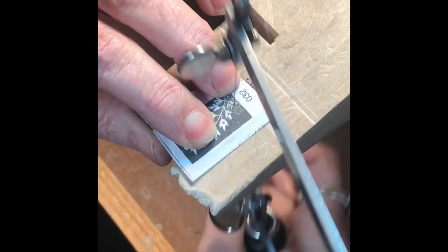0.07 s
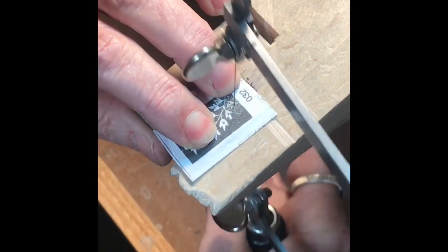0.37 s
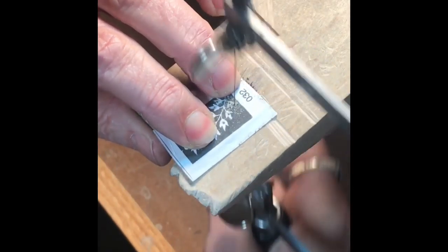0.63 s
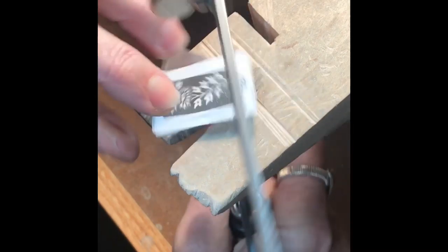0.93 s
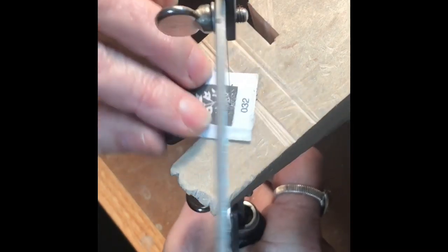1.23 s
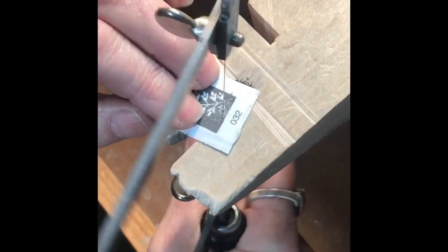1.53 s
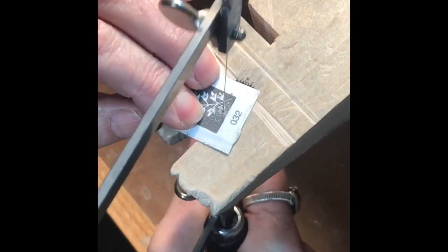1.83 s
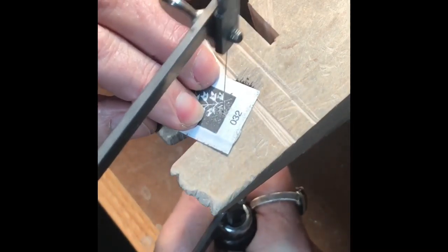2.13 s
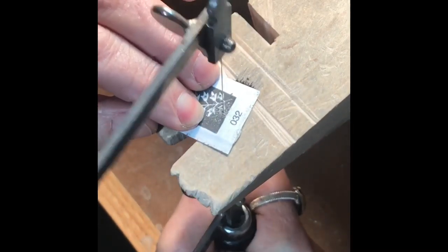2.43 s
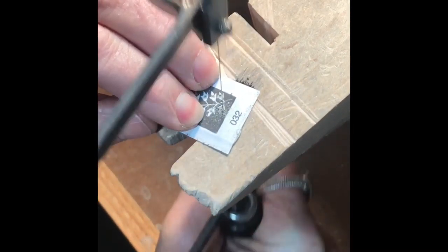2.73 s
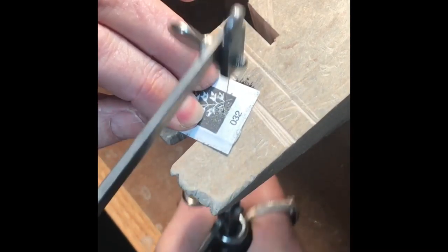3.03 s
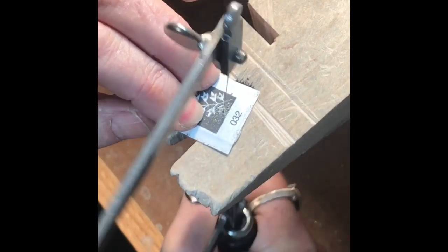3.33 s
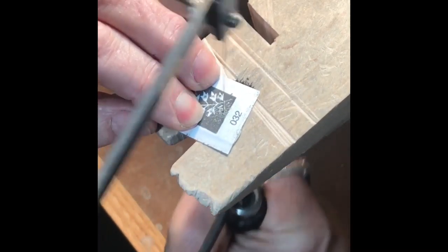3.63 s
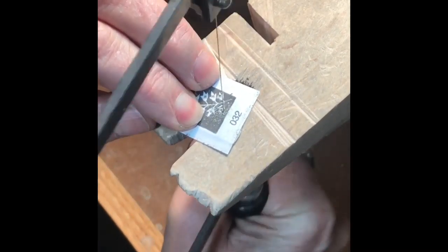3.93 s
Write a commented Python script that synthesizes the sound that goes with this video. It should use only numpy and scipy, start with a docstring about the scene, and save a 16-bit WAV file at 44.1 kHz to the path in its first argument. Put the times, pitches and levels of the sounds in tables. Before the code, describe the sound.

Quick sawing of thin metal with a fine blade, heard close up at a workbench. After five scraping strokes come light clinks and dull taps as the piece is turned, then louder, zipping strokes with soft wooden knocks.

```python
"""A small workshop, one microphone close to the bench: a jeweller's saw cuts a small metal plate.
In each stroke the teeth speed up and slow down, rasping the plate and shaking the wooden bench pin;
frame and hand thump on the pin. After five strokes the plate is let go, clinks against the blade,
is turned and set down; then the sawing resumes, harder. Quiet room tone lies behind it all."""
import sys
import numpy as np
from scipy import signal
from scipy.fft import rfft, irfft
from scipy.io import wavfile

SR = 44100
rng = np.random.default_rng(int(sys.argv[2]) if len(sys.argv) > 2 else 0)


def wav_out(sig):
    """Save sig, one row per channel (or a flat mono array), as 16-bit PCM at SR to the path in sys.argv[1]."""
    wavfile.write(sys.argv[1], SR, np.round(np.clip(np.atleast_2d(sig).T, -1, 1) * 32767).astype(np.int16))


N = 176400
T = np.arange(N) / SR
HZ = np.maximum(np.fft.rfftfreq(16384, 1 / SR), 1)

# Levels are relative within a layer; scene() sets the balance.
# saw strokes: start_s, length_s, peak_share, base_tooth_hz, bench_db, plate_db, rasp_db, zip_db
STROKES = [ (-.02, 0.13, 0.47, 779, -32.5, -34, -37.5, -12.5),
           (0.119, 0.15, 0.49, 899.8, -32, -35, -34, -25),
           (0.289, .168, 0.54, 809.7, -35.5, -37, -38.5, -18),
           (0.465, 0.15, 0.53, 861.6, -35.5, -38.5, -36.5, -20),
           (0.613, 0.15, .5, 694, -39.5, -40, -42, -20), (2.372, 0.13, 0.4, 1010, -31.5, -31, -32.5, -9.5),
           (2.508, 0.17, 0.15, 700, -50.5, -45, -45.5, -34),
           (2.758, 0.17, 0.46, 853, -35.5, -34.5, -36, -17),
           (2.926, 0.18, 0.58, 861, -38.5, -36, -36.5, -6), (3.122, .17, .47, 759.3, -29, -26, -30, -10.5),
           (3.315, 0.17, 0.54, 848.8, -34, -32, -36, -20), (3.527, .15, 0.36, 738, -31.5, -27.5, -31, -6.5),
           (3.683, 0.185, 0.56, 830.8, -34, -30, -31.5, -7),
           (3.895, 0.14, 0.45, 727.3, -28.5, -24.5, -28.5, -9)]
# the teeth dig in harder in mid-stroke: centre_s, half_length_s, lift_db
DIGS = [(.035, .012, 4), (0.207, 0.015, 6.5), (0.376, 0.023, 2.5), (0.544, .012, 6), (2.430, .014, 6.5),
        (2.454, 0.0079, 6), (2.843, 0.034, 3.5), (3.071, 0.028, 3.5), (3.205, 0.023, 3),
        (3.579, 0.018, 6.5), (3.728, 0.013, 3), (3.966, 0.016, 5.5)]
# harmonics of the tooth rate, from the first up: level_db
ZIP_HARMONICS = [-4, 1.5, -12, 3, -2.5, -3.5]
# resonances of the bench pin and saw frame: pitch_hz, width_hz, lift_db
BENCH_MODES = [(226, 14, 5.5), (270.2, 39, 12.5), (342, 15, 3.5), (452, 25, 14.5), (568, 105, -3),
               (608.4, 151, 17), (700, 26, 7.5)]
# resonances of plate and blade in each grip: pitch_hz, width_hz, lift_db
FIRST_GRIP_MODES = [(980, 206, 17.5), (1838, 93, 9.5), (1948, 52, 13), (2212, 80, 14.5), (2440, 170, 18),
                    (2970, 500, 5.5), (3380, 130, 7), (3710, 160, 15), (4096, 200, 19), (4870, 120, 11.5),
                    (5440, 270, 9.5), (6200, 67, -3), (6980, 530, 8), (8450, 680, 9.5)]
SECOND_GRIP_MODES = [(763, 37.6, 2.93), (950, 111.6, 9.5), (1128, 33, 10.7), (1212, 88, 11.37),
                     (1437, 69, 7.98), (1534, 26, 7.2), (1748, 211, 10.1), (2020, 115, 7.9),
                     (2371, 180, 14), (2940, 126, 11), (3440, 39, 10.94), (3867, 220, 9.1), (4540, 240, 4),
                     (5350, 220, 6.9), (5835, 310, 8.1), (8360, 340, 5.6), (10120, 490, 7.5)]
# broad colour under those resonances: frequency_hz, level_db
FIRST_COLOUR = [(30, -30), (70, 14), (150, 8), (400, 11), (800, -10), (1300, -10), (2000, -4.5), (2650, -7),
                (4000, -10.5), (6500, -7), (8200, -14.5), (10300, -20), (11800, -19.5), (15500, -24)]
SECOND_COLOUR = [(30, -16), (70, 11.5), (150, 11), (400, 15), (850, -6.5), (1400, 3.5), (1900, -3),
                 (2600, -1), (3300, -1), (4900, -6), (6200, 0), (7500, -7), (9500, -3.5), (10600, -15),
                 (13000, -4), (13700, -12), (15500, -16)]
# frame and hand thump on the bench pin: start_s, level_db, pitch_hz, swell_s
THUMPS = [(.066, -28.5, 331, 0.0024), (0.135, -35, 332, 0.0036), (.282, -41, 540, 0.004),
          (.596, -37.5, 220, 0.003), (.641, -30.5, 285.8, 0.0077), (.664, -34.5, 264, 0.005),
          (0.935, -36.5, 288, 0.0044), (0.954, -38.5, 153, 0.0038), (.983, -48.5, 109, .008),
          (1.445, -56, 320, 0.0059), (2.323, -48, 268, 0.0073), (2.381, -25.5, 300.3, 0.0069),
          (2.520, -30.5, 281, 0.0021), (3.132, -28.5, 280.9, 0.0087), (3.206, -26.5, 234, .008),
          (3.299, -31, 566, 0.0032), (3.470, -28, 292, .0018), (3.535, -23.5, 290.4, .004),
          (3.579, -20.5, 559.9, .006), (3.589, -23, 255, .004), (3.66, -22, 276, 0.0052),
          (3.909, -19, 272, 0.0036)]
# the blade ticks against the plate or snaps free: start_s, level_db, tilt_db_per_octave
SNAGS = [(.0674, -55, -4), (.027, -42, 3), (0.329, -35.5, 20.5), (0.51, -42, -6), (.661, -37, 19),
         (0.73, -34.5, -4), (0.9331, -39.5, -2.5), (1.044, -57.5, 17), (1.33, -59.5, 10.5),
         (1.4581, -63.5, 3), (2.377, -55, -9), (2.424, -47, 1), (2.456, -37, -14), (3.3233, -40.5, 20),
         (3.657, -36, 5), (3.898, -41.5, 12)]
# colour of a tick before its tilt: frequency_hz, level_db
SNAG_COLOUR = [(200, -7), (1000, -4.5), (2600, -21.5), (3800, 6), (4800, -4), (6200, -3), (8500, -12.5),
               (10500, -21), (13000, -20), (16000, -30.5)]
# the loose plate touches the blade: start_s, level_db
CLINKS = [(0.8071, -33.5), (.8224, -38), (0.8324, -38.5), (0.873, -42.5), (0.881, -47), (.893, -46.5)]
# modes of the loose plate: pitch_hz, level_db, t60_s
CLINK_MODES = [(987, 6, 0.14), (1214, -9, 0.22), (1430, -9, 0.13), (1980, -4, 0.12), (2360, -11, 0.17),
               (2970, -1.5, 0.1), (3860, -16, 0.045), (4690, 8, 0.018), (6270, 1, 0.021), (8360, 7, 0.017),
               (11800, -1, 0.049), (14700, -10, .035)]
# the plate is set down and rocks: start_s, level_db
TAPS = [(1.057, -51.5), (1.1251, -28.5), (1.1285, -25.5), (1.141, -37), (1.149, -35), (1.156, -35.5),
        (1.203, -47)]
# colour of the plate striking wood: frequency_hz, level_db
TAP_COLOUR = [(60, -59), (150, -5), (280, 1), (520, -11), (620, 5.5), (820, -5.5), (1000, 5.5),
              (1400, -5.5), (2100, -13.5), (2700, -23), (3600, -19.5), (4400, -30), (7000, -29),
              (15000, -44)]
# fingers slide the plate over the wood: time_s, level_db
SLIDE_EFFORT = [(0.758, -78), (0.931, -57), (1.0, -67.5), (1.05, -60), (1.1, -62.5), (1.2, -54.5),
                (1.3, -64.5), (1.4, -74.5), (1.7, -68.5)]
# colour of that rubbing: frequency_hz, level_db
SLIDE_COLOUR = [(60, 5), (150, 5.5), (400, 0), (1000, -0.5), (2600, -9.5), (4000, -9), (8000, -16.5),
                (15000, -24)]
# colour of the room tone: frequency_hz, level_db
AIR_COLOUR = [(20, -22), (35, -16), (55, 2.5), (90, -13), (190, -17), (300, -13), (450, -22.5), (700, -23),
              (1100, -28), (3400, -35.5), (16000, -43.5)]


def saw():
    """Main source, close up: the teeth shake the bench (lows), plate (mids) and rasp (highs)."""
    bench_top_hz, plate_top_hz, regrip_s = 462, 2483, 1.5
    speed, rate, (bench, plate, rasp, zip_gain) = stroke_motion()
    scrape, zip_tone = teeth(speed, rate)
    force = scrape + zip_gain * zip_tone
    bench_force = scrape + undb(10) * zip_gain * zip_tone  # the bench follows the tooth rate most
    flicker = undb(1.8 * walk(220))
    low, mid = below(bench_top_hz), below(plate_top_hz)
    drives = [(bench_force * bench * speed ** .083, low),
              (force * plate * speed ** .34, mid * (1 - low)),
              (force * rasp * speed ** .65 * flicker, 1 - mid)]
    out = np.zeros(N)
    starts = [row[0] for row in STROKES]
    for start, end in zip(starts, starts[1:] + [np.inf]):
        colour = FIRST_COLOUR if start < regrip_s else SECOND_COLOUR
        grip = FIRST_GRIP_MODES if start < regrip_s else SECOND_GRIP_MODES
        body = shape(colour, BENCH_MODES + shifted(grip))
        span = (T >= start) & (T < start + .5)  # long enough to ring out
        for drive, band in drives:
            out[span] += ring(drive[span] * (T[span] < end), body * band)
    return out


def stroke_motion():
    """The blade speeds up and slows in each stroke: its speed (0-1), tooth rate and four gains."""
    speed, rate, gains = np.zeros(N), np.zeros(N), np.zeros((4, N))
    for start, length, peak, tooth_hz, *levels_db in STROKES:
        times = start + length * np.array([0, peak, 1])
        swing = np.sin(np.pi * np.interp(T, times, [0, .5, 1]))
        now = (swing > speed) & (T < start + length)
        speed[now], rate[now] = swing[now], tooth_hz * swing[now]
        gains[:, now] = undb(levels_db)[:, None]
    return speed, rate, gains


def teeth(speed, rate):
    """Teeth on metal: a scrape (a click per tooth, grit, chips breaking off) and a pitched zip."""
    chips_per_s, surge_lag_s = 200, .014
    surge = np.exp(.16 * np.maximum(digging(T - surge_lag_s) - 2, 0))  # faster just after a dig
    phase = np.cumsum(rate * surge * (1 + .022 * walk(200))) / SR
    phase = np.maximum.accumulate(phase + .03 * speed * walk(700))  # teeth catch early or late
    bites = np.diff(np.floor(phase), prepend=0) * undb(3.5 * rng.standard_normal(N))
    bites = unit(bites * speed) * np.sqrt(np.mean(rate > 0))
    zip_tone = sum(undb(db + 4 * walk(90)) * np.cos(2 * np.pi * k * phase)
                   for k, db in enumerate(ZIP_HARMONICS, 1))
    grit = unit(np.exp(-(phase % 1) / .58)) * rng.standard_normal(N)
    breaks = rng.random(N) < speed * chips_per_s / SR
    chips = breaks * undb(12 + 2.5 * rng.standard_normal(N))
    pressure = undb(1.6 * walk(150))  # the blade bites unevenly
    scrape = (undb(-3) * bites + grit + chips) * pressure
    dig = undb(digging(T)) / np.std(scrape[rate > 0])
    return dig * scrape, dig * pressure * unit(zip_tone) * rate / rate.max()


def digging(t):
    """Extra pressure on the teeth, in dB."""
    return sum(lift * np.exp(-((t - at) / half) ** 2) for at, half, lift in DIGS)


def shifted(modes):
    """As the cut advances, each resonance moves a little and grows or fades."""
    return [(hz * (1 + .011 * rng.standard_normal()), width, lift + 1.6 * rng.standard_normal())
            for hz, width, lift in modes]


def thumps():
    """Soft blows: the hand-damped bench pin swings for a few cycles, with a woody scuff."""
    out, t = np.zeros(N), T[:SR // 4]
    for start, db, hz, swell_s in THUMPS:
        swell = t / swell_s * np.exp(-t / swell_s)
        wood = undb(-16 * np.hypot(np.log2(HZ / hz), .5))  # falls away either side of the pitch
        scuff = ring(swell * rng.standard_normal(len(t)), wood)
        add(out, start, swell * np.sin(2 * np.pi * hz * t) + undb(-8.5) * scuff, db)
    return out


def snags():
    """Short ticks as the blade catches on the plate or snaps free."""
    out = np.zeros(N)
    octaves = np.log2(np.maximum(HZ, 500) / 4000)
    for start, db, tilt in SNAGS:
        body = shape(SNAG_COLOUR) * undb(tilt * octaves)
        add(out, start, ring(contact(decay_s=.0083, scuff=1.6), body), db)
    return out


def clinks():
    """The loose plate hits the blade with a crack and rings, a little differently each time."""
    out, t = np.zeros(N), T[:SR // 4]
    crack_colour = shape([(200, 0), (900, 3), (2500, -7), (8000, -18), (15000, -33)])
    for start, db in CLINKS:
        ringing = np.zeros(len(t))
        for hz, mode_db, t60 in CLINK_MODES:
            gain = undb(mode_db + 4 * rng.standard_normal())
            pitch_hz = hz * (1 + .0056 * rng.standard_normal())
            ringing += gain * np.sin(2 * np.pi * pitch_hz * t) * undb(-60 * t / t60)
        crack = ring(rng.standard_normal(len(t)) * np.exp(-t / .014), crack_colour)
        add(out, start, ringing / 3 + crack, db)
    return out


def taps():
    """Dull clacks as the plate settles on the wood."""
    out = np.zeros(N)
    body = shape(TAP_COLOUR, modes=[(746, 18, 3), (1250, 22, 2.1)])
    for start, db in TAPS:
        add(out, start, ring(contact(decay_s=.0063, scuff=2.2), body), db)
    return out


def slide():
    """Faint uneven rubbing on the wood while the plate is turned."""
    times, db = np.array(SLIDE_EFFORT).T
    moving = (T > times[0]) & (T < times[-1])
    effort = undb(np.interp(T, times, db) + .73 * walk(60.2)) * moving
    return ring(effort * rng.standard_normal(N), shape(SLIDE_COLOUR))


def workshop(direct):
    """The walls return a short tail behind the direct sound, weaker and shorter in the treble."""
    t, out, low = T[:SR // 2], direct, below(2110)
    for db, t60_s, band in ((-9, .22, low), (-12.5, .15, 1 - low)):
        tail = rng.standard_normal(len(t)) * undb(-60 * t / t60_s) * (t > .004)
        tail = ring(tail / np.linalg.norm(tail), band) * np.sqrt(np.mean(band ** 2))
        out = out + undb(db) * signal.fftconvolve(direct, tail)[:N]
    return out


def room_tone():
    """Background: a steady low rumble with a little hiss."""
    return unit(ring(rng.standard_normal(N), shape(AIR_COLOUR)))


def contact(decay_s, scuff):
    """A sharp blow and the short scuff that follows it."""
    t = T[:SR // 4]
    push = scuff * rng.standard_normal(len(t)) * np.exp(-t / decay_s) * np.sqrt(2 / (decay_s * SR))
    push[0] += 1
    return push


def add(out, start, sound, db):
    """Mix in a hit; db sets the level of its first 10 ms."""
    i = int(start * SR)
    sound = sound[:N - i]
    out[i:i + len(sound)] += undb(db) * sound / np.sqrt(np.mean(sound[:SR // 100] ** 2))


def ring(x, gain):
    """Pass a sound through a causal body with this gain curve; white noise keeps its power."""
    cepstrum = irfft(np.log(unit(gain) + 1e-6))
    half = len(cepstrum) // 2
    folded = np.r_[cepstrum[0], 2 * cepstrum[1:half], np.zeros(half)]  # minimum phase
    response = irfft(np.exp(rfft(folded)))[:half]
    return signal.fftconvolve(x, response)[:len(x)]


def shape(colour, modes=()):
    """Gain over frequency: a broad colour lifted by resonances."""
    hz, db = np.array(colour, float).T
    broad = np.interp(np.log(HZ), np.log(hz), db)
    peaks = sum(lift / (1 + (2 * (HZ - f) / width) ** 2) for f, width, lift in modes)
    return undb(broad + peaks)


def below(hz):
    """Gain of a steep low-pass."""
    return 1 / (1 + (HZ / hz) ** 8)


def walk(per_s):
    """Smooth random wander with an rms of one."""
    steps = rng.standard_normal(N // 20)
    return unit(np.interp(T * per_s, np.arange(len(steps)), steps))


def undb(db):
    """Decibels to gain."""
    return 10 ** (np.asarray(db) / 20)


def unit(x):
    """Scale to an rms of one."""
    return x / np.sqrt(np.mean(x ** 2))


def scene():
    """At the microphone, in mono: saw and handling close by, the workshop behind."""
    sawing = undb(-7) * saw() + undb(-4) * thumps() + undb(-3.5) * snags()
    handling = undb(-5.5) * clinks() + undb(-7) * taps() + undb(-2) * slide()
    return (workshop(sawing + handling) + undb(-61.5) * room_tone())[None]


def record(dry):
    """The recorder cuts the top steeply above 15.8 kHz."""
    return signal.sosfilt(signal.ellip(8, .2, 70, 15800, fs=SR, output="sos"), dry)


dry = scene()
out = record(dry)
wav_out(out)
```